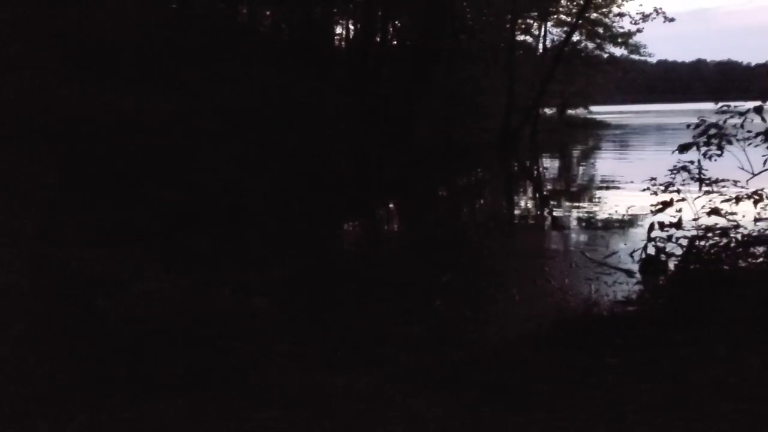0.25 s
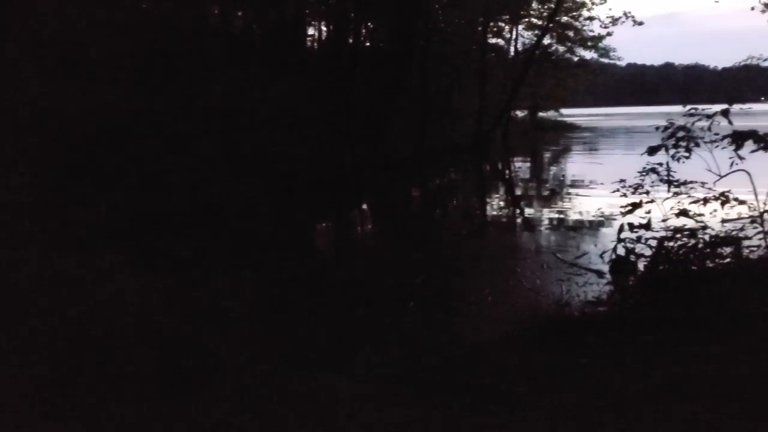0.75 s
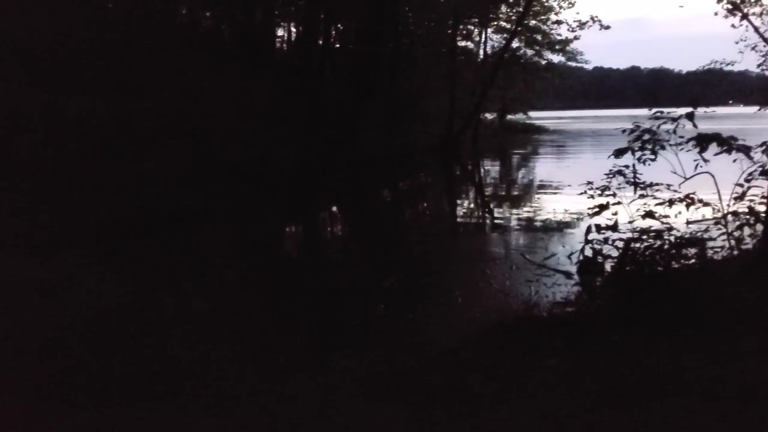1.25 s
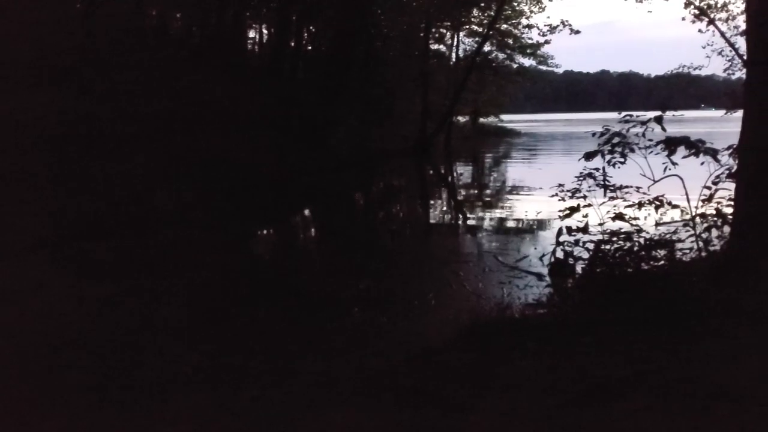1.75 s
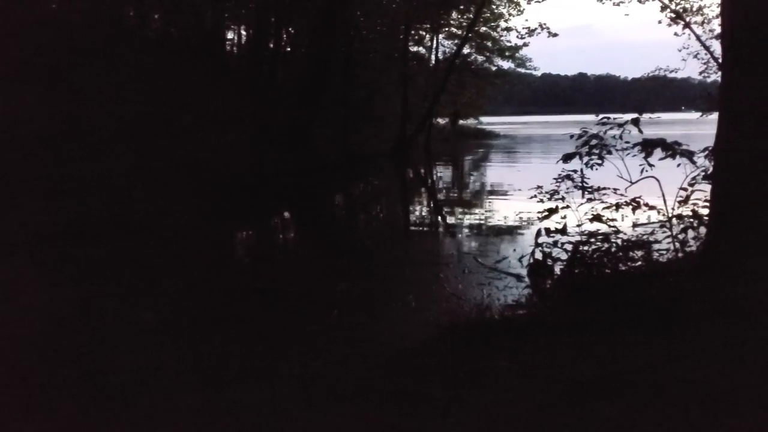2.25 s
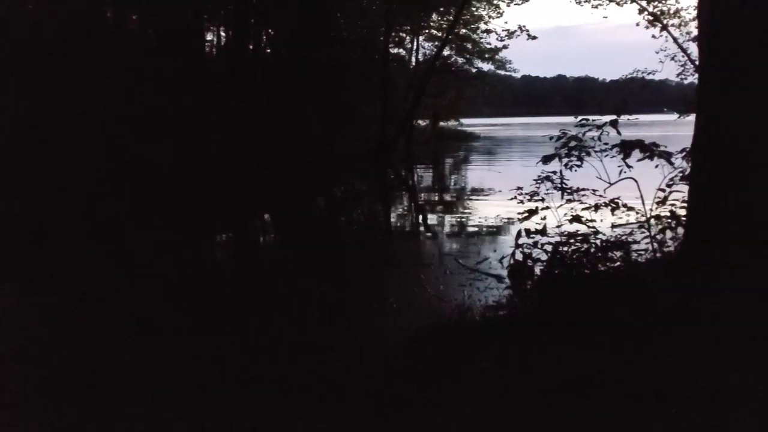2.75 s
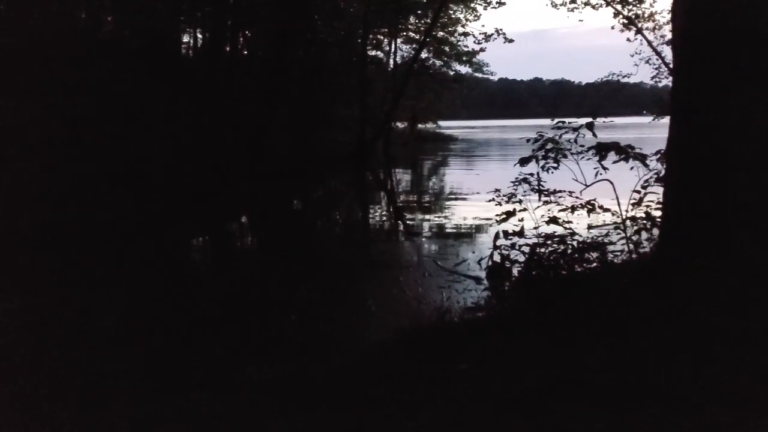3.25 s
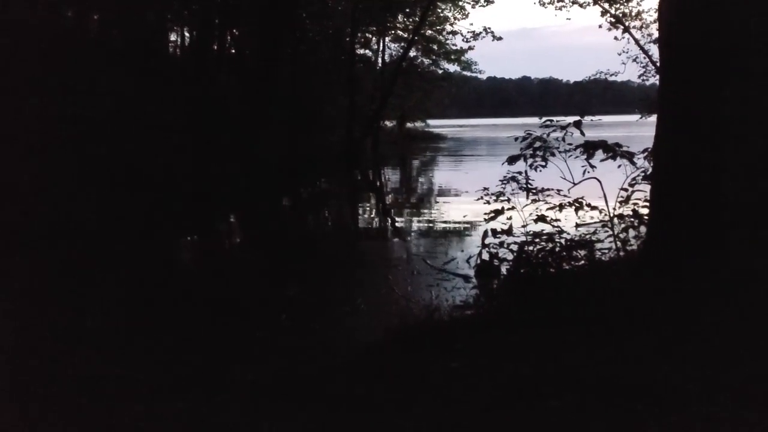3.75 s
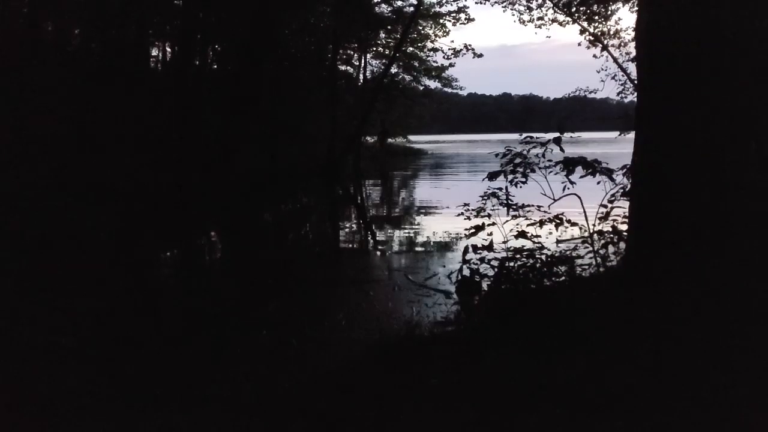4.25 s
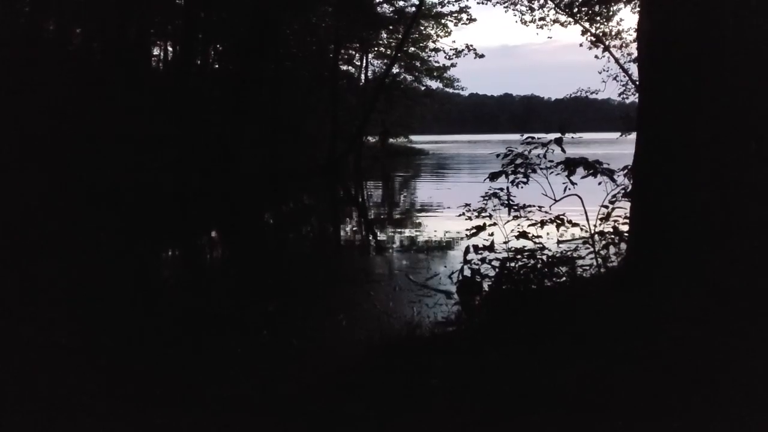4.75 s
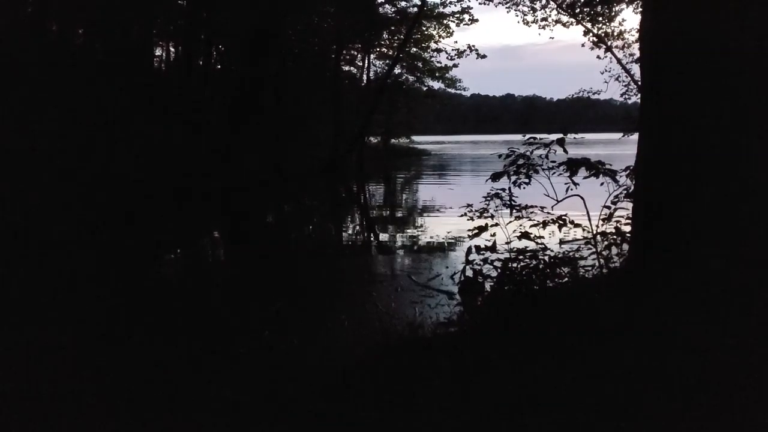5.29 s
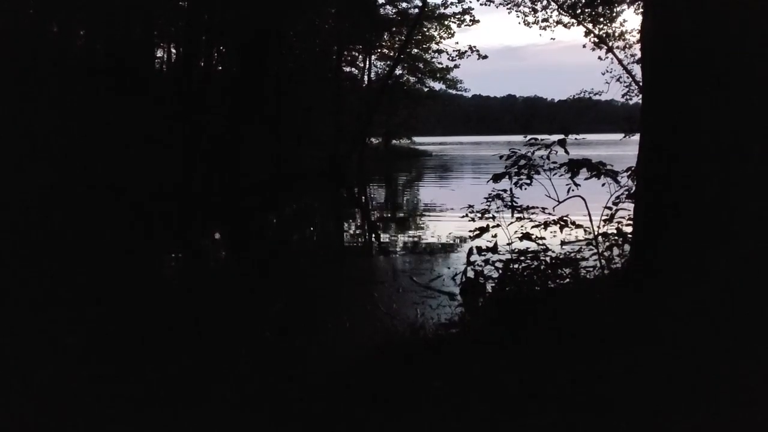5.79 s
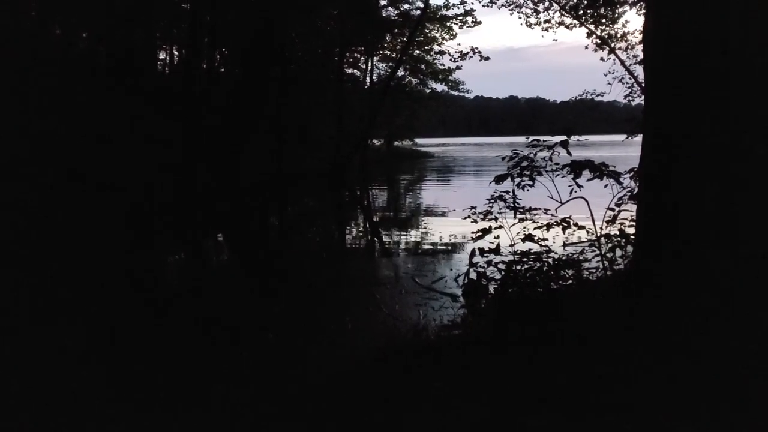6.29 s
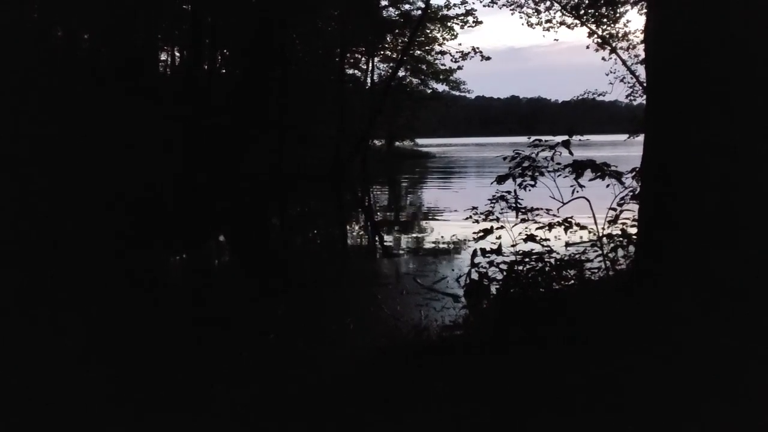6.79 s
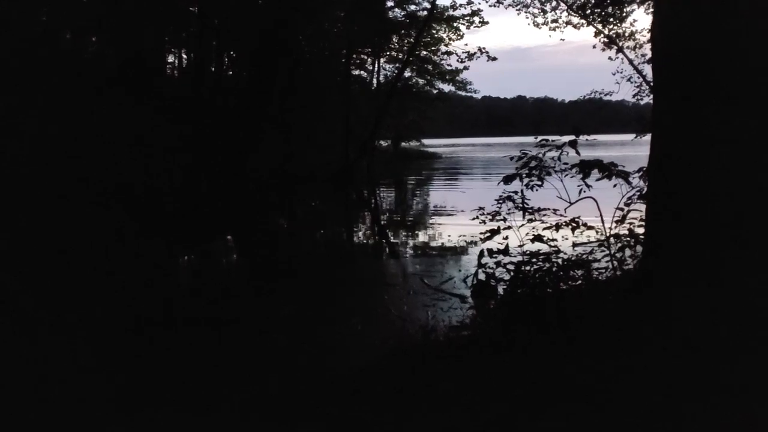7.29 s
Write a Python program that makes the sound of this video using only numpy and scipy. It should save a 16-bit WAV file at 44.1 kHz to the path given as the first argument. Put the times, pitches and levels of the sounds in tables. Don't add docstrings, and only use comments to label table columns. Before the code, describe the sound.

At a dusk lakeside, drawn-out nasal toad calls rise and overlap above pulsing insect hiss, pebble-like frog clicks, and brief low grunts.

```python
import sys
import numpy as np
from scipy import signal
from scipy.fft import rfft, irfft, next_fast_len
from scipy.io import wavfile
from scipy.ndimage import uniform_filter1d, map_coordinates

SR = 44100
rng = np.random.default_rng(int(sys.argv[2]) if len(sys.argv) > 2 else 0)


def decibels_to_gain(level_db):
    exponent = np.asarray(level_db, float) / 20
    return 10 ** exponent


def to_wav(sig):
    pcm = np.clip(np.atleast_2d(sig), -1, 1) * 32767
    pcm = np.round(pcm).astype(np.int16)
    wavfile.write(sys.argv[1], SR, pcm.T)


N = 332220


def unit(x):
    return x / np.sqrt(np.mean(x ** 2) + 1e-20)


def along(points, hz):
    point_hz, value = np.transpose(points)
    return np.interp(np.log(hz + 1), np.log(point_hz + 1), value)


def curves(rows):
    s, *columns = np.transpose(rows)
    return [np.interp(np.arange(N) / SR, s, column) for column in columns]


def wobble(knots_per_s):
    knots = rng.standard_normal(int(N * knots_per_s / SR) + 4)
    return map_coordinates(knots, [np.arange(N) * knots_per_s / SR])


def filtered(x, response):
    m = next_fast_len(N + 8192)
    return irfft(rfft(x, m) * response(np.fft.rfftfreq(m, 1 / SR)), m)[..., :N]


def bursts(s, level, hz, rise_s, tail, phase=0, glide_hz_per_s=0):
    def column(value):
        return (value + 0 * s)[:, None]

    at = np.round(s * SR).astype(int)[:, None] + np.arange(-400, 700)
    t = at / SR - s[:, None]
    spread_s = column(rise_s) * np.where(t > 0, tail, 1)
    turns = (column(hz) + .5 * column(glide_hz_per_s) * t) * t
    wave = np.exp(-.5 * (t / spread_s) ** 2) * np.cos(2 * np.pi * turns + column(phase))
    return np.bincount(np.clip(at, 0, N).ravel(), (level[:, None] * wave).ravel(), N + 1)[:N]


def placed(x, lean_db, lead_ms):
    side = np.array([[.5], [-.5]])
    return filtered(x, lambda hz: decibels_to_gain(side * lean_db) * np.exp(2j * np.pi * hz * side * lead_ms / 1000))


# (frequency [Hz], correlation [-1..1])
LIKENESS = [(40, 0.96), (120, 0.97), (290, 0.94), (640, 0.39), (1400, -0.46), (3100, 0), (15000, 0)]
# (frequency [Hz], left over right [dB])
BALANCE = [(60, 0.5), (180, 1), (550, 0.5), (1650, 3), (4970, 3.0), (15000, 1.5)]


def rush(source, spectrum, patchy_db):
    z = signal.stft(source, nperseg=512)[2]
    field = uniform_filter1d(rng.standard_normal(z.shape[1:]), size=5, axis=0)
    field = uniform_filter1d(field, size=10, axis=1)
    pair = signal.istft(z * decibels_to_gain(patchy_db * unit(field)), nperseg=512)[1][:, :N]

    def mid_side(hz):
        angle = np.arccos(np.clip(along(LIKENESS, hz), -1, 1)) / 2
        return decibels_to_gain(along(spectrum, hz)) * [np.cos(angle), np.sin(angle)]

    mid, side = filtered(pair, mid_side)
    both = filtered(np.array([mid + side, mid - side]),
                    lambda hz: decibels_to_gain(np.outer([.5, -.5], along(BALANCE, hz))))
    return both / np.sqrt(np.mean(both.mean(0) ** 2))


# (frequency [Hz], density [dB per Hz])
RUMBLE_SPECTRUM = [(12, -64), (20, -26), (46, -4.5), (81, 1.5), (114, -3), (151, -6.5), (259, -11),
                   (349, -21.5), (492, -21.5), (600, -30.5), (780, -30), (1320, -120)]
# (frequency [Hz], density [dB per Hz])
AIR_SPECTRUM = [(250, -23), (400, -7), (800, -9), (1200, 5), (1600, -7), (2200, -30)]
# (time [s], gain [dB])
MOTOR_FADE = [(0, 2.5), (2.9, 2.8), (4, 1.5), (5.5, -9.5), (7.53, -4)]


def hum():
    motor_db, = curves(MOTOR_FADE)
    surge_db = 4 * np.exp(-.5 * ((np.arange(N) / SR - 3.61) / 0.26) ** 2)
    motor = np.sin(2 * np.pi * np.cumsum(125 + 1.67 * wobble(3.4)) / SR)
    rumble = decibels_to_gain(-52 + surge_db) * rush(rng.standard_normal((2, N)), RUMBLE_SPECTRUM, patchy_db=1.3)
    air = decibels_to_gain(-64 + 1.25 * motor_db) * rush(rng.standard_normal((2, N)), AIR_SPECTRUM, patchy_db=3.5)
    return rumble + decibels_to_gain(-56.5 + motor_db + 1.6 * wobble(2.1)) * motor + air


# (start [s], lull before it [dB], crest [dB], brightness [dB])
THROBS = [(-.2, -43, -37, -13.5), (0.312, -41.5, -33, -11.5), (.84, -41, -36.5, -13.5),
          (1.36, -43, -35, -14.5), (1.86, -44, -36, -12), (2.389, -40.5, -35.5, -14),
          (2.93, -40.5, -35, -12.5), (3.42, -39, -31.5, -12), (3.92, -40.5, -34, -12.5),
          (4.282, -41.5, -37, -13.5), (4.86, -40.5, -35.5, -13), (5.329, -42.5, -34.5, -12),
          (5.868, -42, -35.5, -14), (6.39, -43, -34.5, -14), (6.84, -40, -35, -12),
          (7.38, -43.5, -37.5, -15.5), (7.9, -43, -37, -14)]


def throbbing():
    swell_s, fade_s = 0.12, .17
    lull_dull_db, late_dull_db = -17.5, -1
    rows = []
    for (s, lull_db, crest_db, bright_db), (end_s, *_) in zip(THROBS, THROBS[1:]):
        crest_s = s + min(0.52 * (end_s - s), end_s - s - fade_s - .01)
        rows += [(s, lull_db, lull_dull_db),
                 (s + swell_s, crest_db - 2, bright_db),
                 (crest_s, crest_db, bright_db + late_dull_db / 2),
                 (end_s - fade_s, crest_db - 1, bright_db + late_dull_db)]
    return curves(rows)


# (frequency [Hz], density [dB per Hz])
WING_SPECTRUM = [(560, -56), (950, -57), (1070, -61), (1130, -29.5), (1260, -19.5), (1560, -10),
                 (1740, -8.5), (1960, 2.5), (2350, -4), (3130, 3.5), (3760, -3), (4500, -0.5), (5640, -4.5),
                 (6760, -13.5), (7500, -29.5), (9750, -37), (16500, -120)]
# (frequency [Hz], density [dB per Hz])
SIZZLE_SPECTRUM = [(4290, -51), (7300, -20.5), (9110, -19.5), (12500, -1.5), (15000, -1), (15700, -1.5)]


def katydids():
    def strikes(knots_per_s, spread_db):
        unevenness = np.array([wobble(knots_per_s), wobble(knots_per_s)])
        return rng.standard_normal((2, N)) * decibels_to_gain(spread_db * unevenness)

    level_db, top_db = throbbing()
    level_db = level_db + 0.09 * wobble(12) + 0.67 * wobble(35)
    body = decibels_to_gain(level_db + 1.0) * rush(strikes(900, 0.29), WING_SPECTRUM, patchy_db=1.0)
    sizzle = rush(strikes(1500, 0.87), SIZZLE_SPECTRUM, patchy_db=-1.8)
    return body + decibels_to_gain(level_db + top_db + 6.0) * sizzle


# (start [s], clicks [count], first level [dB], first pitch [Hz])
LOW_FROG = [(.0044, 1, -33, 2330), (.0837, 4, -32.5, 2200), (.2548, 1, -33, 2340), (.4429, 3, -36.5, 2230),
            (.5756, 2, -32, 2320), (.6354, 1, -35, 2300), (.8659, 1, -36, 2240), (.8794, 1, -32, 2280),
            (.8994, 2, -33, 2310), (1.4032, 3, -32, 2322), (1.6392, 1, -32, 2428), (2.0772, 1, -34, 2373),
            (2.5671, 1, -30.5, 2370)]
HIGH_FROG = [(.1521, 2, -24, 2580), (.2758, 3, -21.5, 2594), (.6044, 1, -30, 2540), (.7537, 1, -34, 2510),
             (.7696, 2, -23.5, 2610), (1.6571, 2, -29, 2480), (1.6906, 1, -24, 2468),
             (1.8292, 2, -21.5, 2570), (2.593, 1, -27, 2520), (2.7457, 1, -25, 2440),
             (2.7626, 1, -26, 2580), (2.7796, 1, -26, 2500), (2.8998, 2, -20.5, 2550),
             (2.9776, 2, -23, 2590), (3.1752, 2, -27, 2520)]
# (time [s], peak [dB])
HIGH_CLICKS = [(0.16, -28), (0.4, -33), (0.4274, -44), (0.4643, -40), (0.4788, -38), (0.6834, -27),
               (0.957, -39), (1.2027, -31), (1.2235, -28), (1.5205, -35), (1.6576, -25.5), (2.085, -39),
               (3.536, -34), (3.5633, -42), (3.5813, -33), (3.6355, -26.5), (4.0268, -37), (4.041, -26),
               (4.225, -29), (4.4223, -30), (5.8199, -39), (7.2245, -34)]


def small_frogs():
    clicks = []
    for runs, pan_db, step_hz, step_pan_db, step_db in [(LOW_FROG, 7.5, 70, -1.8, 1.5),
                                                       (HIGH_FROG, 1, -40, -6.5, -5.5)]:
        for s, count, db, hz in runs:
            for k in range(round(count)):
                clicks.append((s + k * .0168, db + k * step_db, hz + k * step_hz, pan_db + k * step_pan_db))
    clicks += [(s, db - 3.5, 3200, 2.5) for s, db in HIGH_CLICKS]
    s, db, hz, pan_db = np.transpose(clicks)
    chance = rng.standard_normal((len(s), 2))
    hz = hz * (1 + 0.0067 * chance[:, 0])
    pan_db = pan_db + 0.84 * chance[:, 1]
    return np.array([bursts(s + 0.00231 - lead_s, decibels_to_gain(db + 0.5 + side * pan_db), hz, 0.00099, tail=3.0)
                     for side, lead_s in [(1.0, 0.000823), (-0.62, 0.0052)]])


# (frequency [Hz], level [dB], relative length [ratio])
SIDE_MODES = [(2239, -10, 1.1), (2047, -16.5, 3.2), (1813, -4.5, 1.25), (1310, -33.5, 2.9),
              (1196, -19.5, 0.96)]


def toad(calls, full_ms, ms_per_db, shortest_ms, strict_s, strict_ms, loose_ms, catch_s, throat_db,
         free_tone=False):
    voice = np.zeros(N)
    for call in calls:
        s, pulse_hz, db, tone_hz = np.transpose(call)
        t = np.arange(s[0], s[-1], 1 / SR)
        turns = np.cumsum(np.interp(t, s, pulse_hz)) / SR
        when = np.interp(np.arange(1, turns[-1]), turns, t)
        tone_turns = np.cumsum(np.interp(t, s, tone_hz)) / SR
        phase = free_tone * 2 * np.pi * np.interp(when, t, tone_turns)
        chance = rng.standard_normal((260, 3))[:len(when)]
        age_s, effort_db = when - s[0], np.interp(when, s, db)

        scatter_ms = np.where(age_s < strict_s, strict_ms, loose_ms) * np.where(age_s < catch_s, .3, 1)
        when = when + (scatter_ms * chance[:, 0] - .16 * (age_s > catch_s)) / 1000

        length_ms = np.maximum(full_ms + ms_per_db * (effort_db - db.max()), shortest_ms)
        length_ms = length_ms + .6 * np.exp(-(age_s / 0.19) ** 4) + 0.31 * age_s
        rise_s = np.clip(length_ms, .5, 2.6) / 1000
        level = decibels_to_gain(effort_db + 0.14 * chance[:, 1]) / np.sqrt(rise_s * np.interp(when, s, pulse_hz))

        glide_hz_per_s = 30000 * np.clip((.00175 - rise_s) / 0.00012, 0, 1)
        nearing = 0.61 * np.exp(-((age_s - 0.099) / 0.053) ** 2)
        sac_hz = np.interp(when, s, tone_hz) + free_tone * 102.6 * (1 - nearing)
        voice += bursts(when, level, sac_hz * (1 + 0.011 * chance[:, 2]), 0.87 * rise_s, tail=1.23,
                        phase=phase, glide_hz_per_s=glide_hz_per_s)

        sharpness_db = throat_db - 16000 * (rise_s - .0011)
        for hz, mode_db, length in SIDE_MODES:
            voice += bursts(when, level * decibels_to_gain(mode_db + sharpness_db), hz, length * rise_s, tail=1.15,
                            phase=phase)
    return filtered(voice, lambda hz: hz ** 8 / (hz ** 8 + 1130. ** 8))


# (time [s], pulse rate [1/s], effort [dB], tone [Hz])
LEFT_CALLS = [
    [(.865, 152, -51, 1504), (.92, 200, -27.5, 1720), (.96, 157, -24, 1858), (1.015, 170, -22.5, 1945),
     (1.07, 180, -23, 1902), (1.13, 168, -35.5, 1815), (1.42, 144, -34.5, 1791), (1.85, 122, -29.5, 1813),
     (1.925, 107, -33, 1816)],
    [(3.98, 160, -43, 1560), (4.02, 170, -36, 1738), (4.1, 176, -22, 1890), (4.145, 164, -25.5, 1942),
     (4.18, 160, -26, 1835), (4.245, 161.5, -36.5, 1795), (4.78, 150.5, -32.5, 1784),
     (5.06, 134.6, -29.5, 1813), (5.16, 132, -30, 1790)],
]


def left_toad():
    return toad(LEFT_CALLS, full_ms=1.85, ms_per_db=0.096, shortest_ms=1.11,
                strict_s=0.21, strict_ms=.03, loose_ms=.21, catch_s=0.26, throat_db=-0.5, free_tone=True)


# (time [s], pulse rate [1/s], effort [dB], tone [Hz])
FAR_CALLS = [
    [(2.66, 143, -48, 1560), (2.72, 157, -36, 1810), (2.76, 165, -39, 1840), (2.8, 175, -33, 1940),
     (2.85, 173.1, -44.5, 1900), (2.98, 174.5, -43, 1930), (3.15, 165.4, -43, 1938),
     (3.4, 157.8, -38.5, 1875), (3.615, 153.3, -38.5, 1900)],
]


def far_toad():
    return toad(FAR_CALLS, full_ms=1.2, ms_per_db=0.046, shortest_ms=0.85,
                strict_s=.66, strict_ms=0.15, loose_ms=0.13, catch_s=.66, throat_db=-1.0)


# (time [s], peak [dB])
TWIG = [
    (2.899, -28.5),
]


def twig():
    s, db = np.transpose(TWIG)
    return bursts(s + .0008, decibels_to_gain(db + 1.5), 7000, .00009, tail=3)


# (time [s], pulse rate [1/s], effort [dB], tone [Hz])
FRONT_CALLS = [
    [(3.655, 143.8, -53, 1560), (3.68, 162.2, -34.5, 1676), (3.72, 165, -25.5, 1760),
     (3.78, 173.9, -24, 1840), (3.88, 174.1, -21.5, 1940), (3.95, 175.4, -28.5, 1950),
     (4.2, 172.4, -39, 1970), (5, 151.2, -38.5, 2020), (5.235, 139.3, -47, 1870)],
    [(6.18, 147.6, -49, 1550), (6.219, 161.6, -31, 1700), (6.3, 173.8, -24.5, 1840),
     (6.4, 176.4, -20, 1910), (6.5, 174.3, -29.5, 1950), (6.65, 171.3, -27, 1947),
     (6.986, 164.3, -24.5, 1868), (7.22, 159.5, -27, 1830), (7.53, 155, -26.5, 1780)],
]


def front_toad():
    return toad(FRONT_CALLS, full_ms=1.36, ms_per_db=0.052, shortest_ms=0.85,
                strict_s=1.05, strict_ms=0.054, loose_ms=0.099, catch_s=.215, throat_db=-6.0)


# (start [s], pulses [count], gap [ms], peak [dB], crest [share of grunt])
GRUNTS = [
    (5.801, 4.4, 7.1, -30.5, 0.4),
    (5.908, 3.7, 13, -36.5, 0.41),
    (6.039, 6, 8.7, -35, 0.72),
]


def grunter():
    pulses = []
    for s, count, gap_ms, db, crest in GRUNTS:
        for k in range(round(count)):
            edge_db = 16 * ((k + .5) / count - crest) ** 2
            pulses.append((s + k * gap_ms / 1000, db - edge_db, gap_ms / 1000))
    s, db, gap_s = np.transpose(pulses)
    chance = rng.standard_normal((len(s), 4))
    s, db = s + 0.00058 * chance[:, 0], db + 1.8 * chance[:, 1]
    rise_s = 0.24 * gap_s * decibels_to_gain(1.5 * chance[:, 2])
    hz = 494 * (1 + 0.032 * chance[:, 3])
    throat = bursts(s, decibels_to_gain(db - 0.5), hz, rise_s, tail=1.84)
    overtone = bursts(s, decibels_to_gain(db - 15.5), 1.8 * hz, 0.001, tail=1.3)
    chest = bursts(s, decibels_to_gain(db - 11.5), 0.65 * hz, rise_s, tail=1.4)
    return throat + overtone + chest


# (time [s], peak [dB], pitch [Hz], rise [ms])
GULP = [
    (6.178, -47, 308, 5.1),
]


def gulp():
    s, db, hz, rise_ms = np.transpose(GULP)
    return bursts(s, decibels_to_gain(db), hz, rise_ms / 1000, tail=1.6)


def bank(x, t60_s, delay_s):
    t = np.arange(SR // 2) / SR
    tail = rng.standard_normal((2, len(t))) * decibels_to_gain(-60 * t / t60_s) * (t > delay_s)
    return signal.fftconvolve(x[None], tail / np.linalg.norm(tail[0]), axes=1)[:, :N]


def scene():
    background = hum() + katydids()
    clicks = small_frogs()
    left, far, front = left_toad(), far_toad(), front_toad()
    grunt = grunter() + gulp()

    voices = clicks + decibels_to_gain(4.5) * placed(left, lean_db=8.5, lead_ms=0.32)
    voices = voices + decibels_to_gain(-2.0) * placed(far, lean_db=6.0, lead_ms=0.41)
    voices = voices + decibels_to_gain(2.0) * placed(front, lean_db=3.0, lead_ms=0.44)
    voices = voices + placed(grunt + twig(), lean_db=3.5, lead_ms=.37)

    toads = left + front + far
    echoes = decibels_to_gain(-14) * bank(toads, t60_s=.04, delay_s=.003)
    echoes = echoes + decibels_to_gain(-11.0) * bank(toads, t60_s=0.15, delay_s=0.038)
    echoes = echoes + decibels_to_gain(-2.0) * bank(clicks[0], t60_s=0.27, delay_s=0.00097)
    echoes = echoes + decibels_to_gain(-16.0) * bank(grunt, t60_s=0.4, delay_s=0.012)
    return background + voices + echoes


def roll_off(x):
    return signal.sosfilt(signal.butter(12, 15990, fs=SR, output="sos"), x)


def record(dry):
    mix = filtered(dry, lambda hz: hz < 15780)
    return roll_off(mix)


dry = scene()
out = record(dry)
to_wav(out)
```